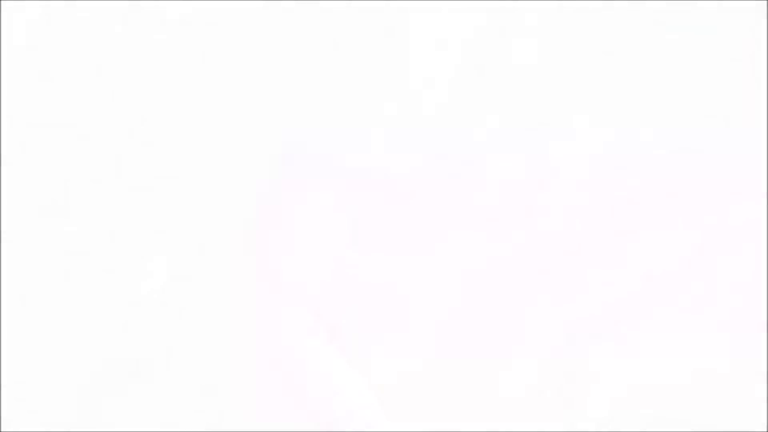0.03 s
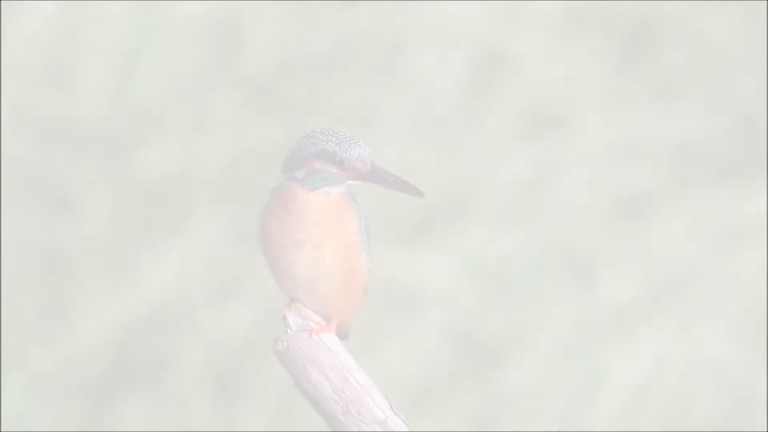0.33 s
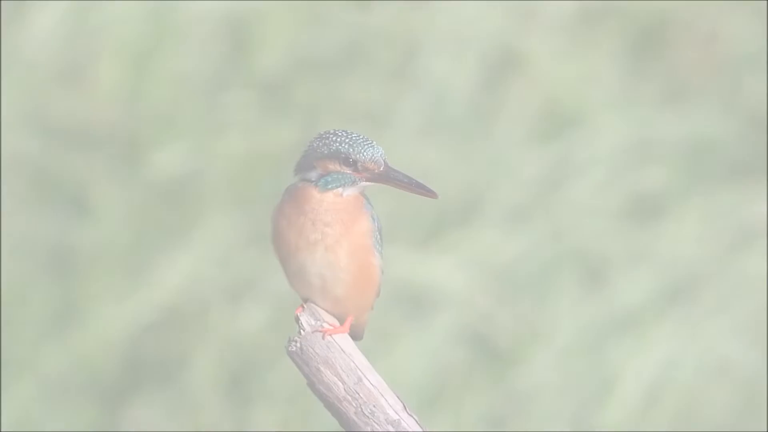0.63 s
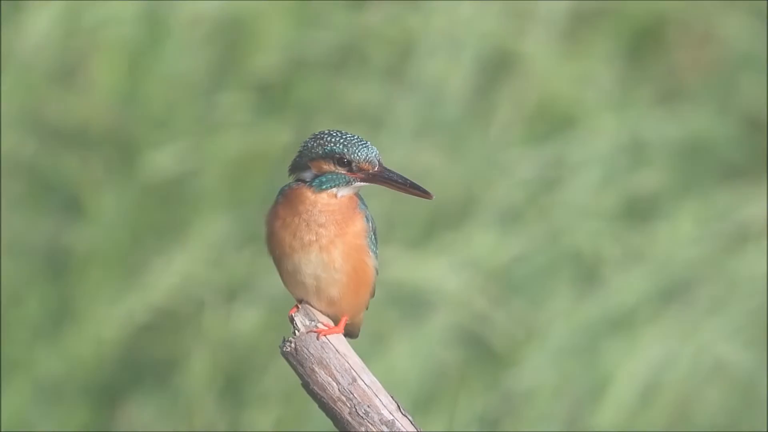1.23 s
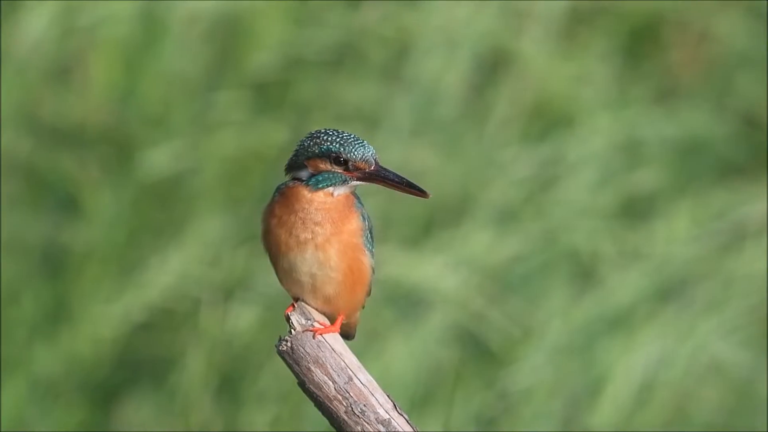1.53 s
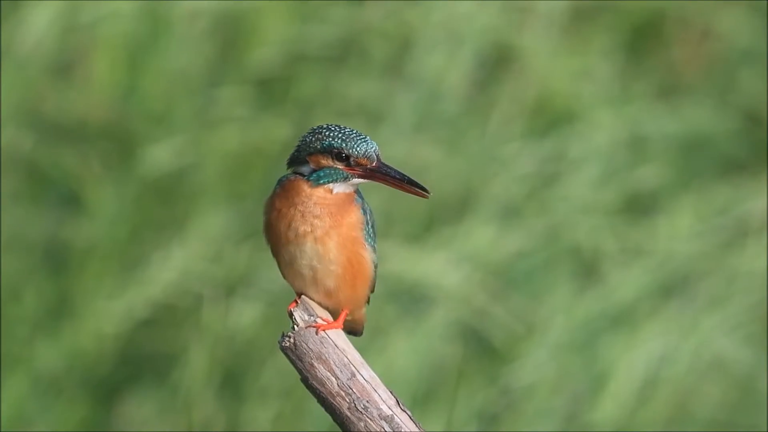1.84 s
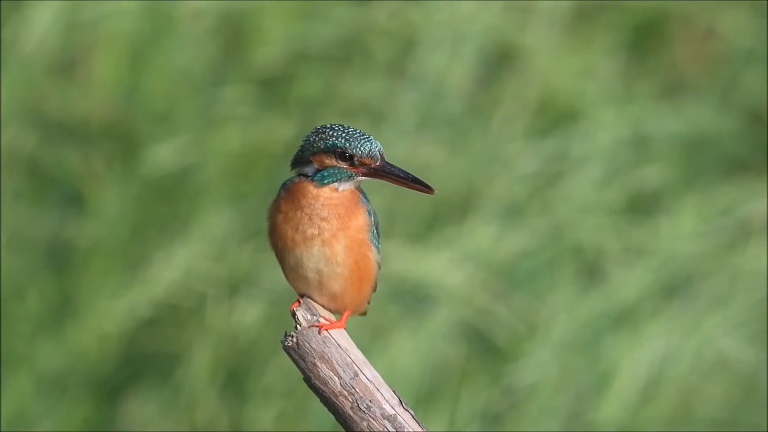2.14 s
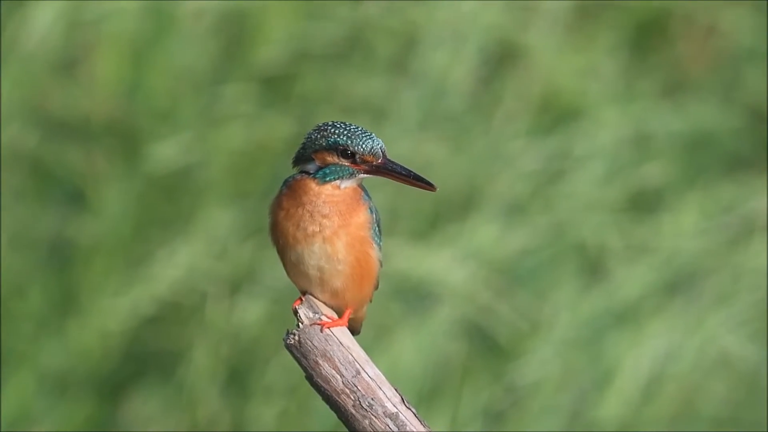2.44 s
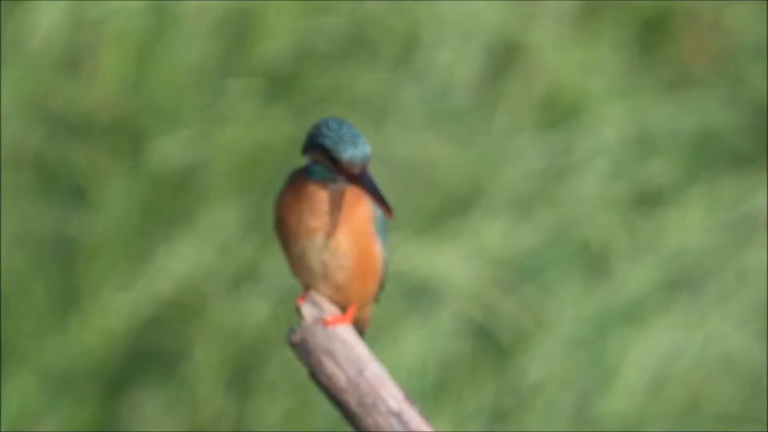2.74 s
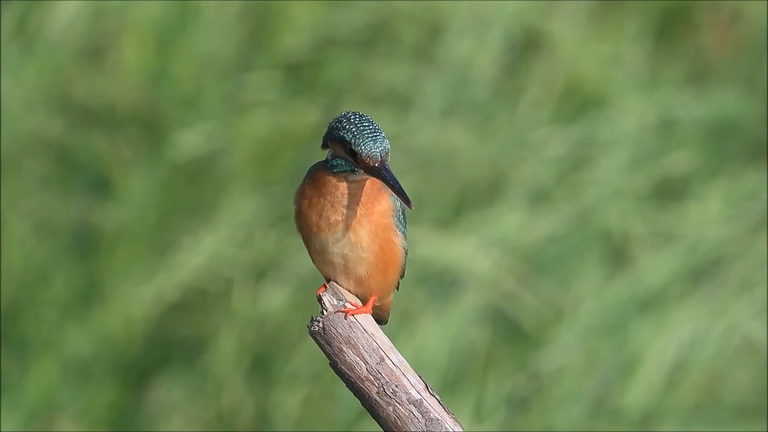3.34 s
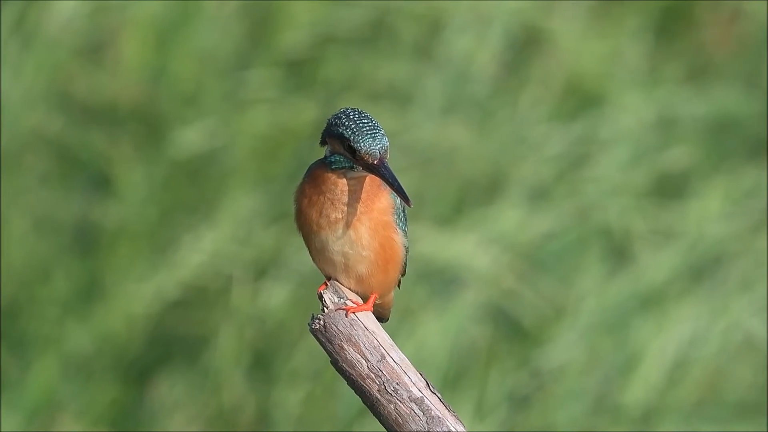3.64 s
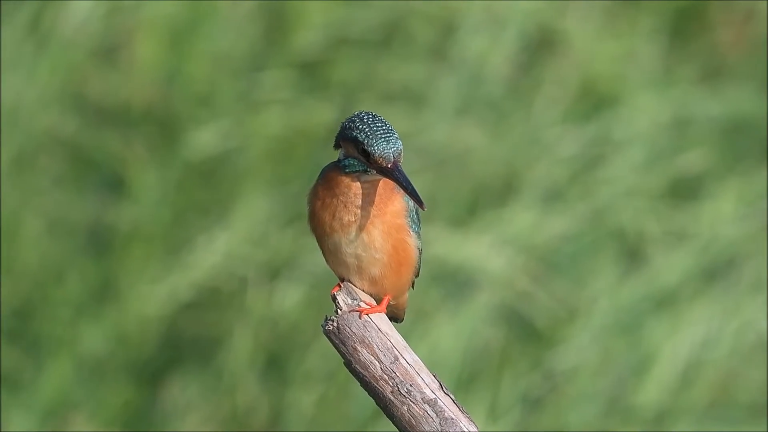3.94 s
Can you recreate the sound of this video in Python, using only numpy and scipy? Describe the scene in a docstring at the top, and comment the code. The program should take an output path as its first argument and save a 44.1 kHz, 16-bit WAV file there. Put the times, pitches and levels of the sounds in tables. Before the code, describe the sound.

A kingfisher gives three thin, high whistles over steady outdoor noise and light microphone taps.

```python
"""Kingfisher among trees

A kingfisher gives three thin, falling whistles, almost pure tones, that echo briefly among trees.
A steady wash of outdoor noise fades in behind it. Close by there is a soft bump and a short rustle.
Later, small taps ring the hollow housing of the right microphone, with scuffs and a thin scrape."""
import sys
import numpy as np
from scipy import signal
from scipy.fft import rfft, irfft
from scipy.io import wavfile
from scipy.ndimage import uniform_filter1d

SR = 44100
rng = np.random.default_rng(int(sys.argv[2]) if len(sys.argv) > 2 else 0)


def store_wav(level_fs):
    """Save 16-bit WAV to argv[1]."""
    pcm = np.round(np.clip(np.atleast_2d(level_fs), -1, 1) * 32767)
    wavfile.write(sys.argv[1], SR, pcm.T.astype(np.int16))


N = 176400  # 4 seconds

# The bird's notes: start_s, length_s, top_hz, end_hz, mid_fall_s (after the start), fall_pace_s
NOTES = [(0.994, 0.063, 5460, 4800, .043, 0.0078), (1.876, 0.065, 5800, 4890, 0.028, 0.0046),
         (2.825, 0.0636, 5604, 4920, .036, .0055)]
# How each note swells and dips, one list per note: time_s, level_db
NOTE_LOUDNESS = [
    [(.995, -43), (1.003, -40), (1.013, -47), (1.021, -32), (1.032, -25.5), (1.041, -36), (1.057, -34)],
    [(1.878, -30), (1.891, -23.5), (1.898, -33), (1.907, -25.5), (1.914, -41), (1.926, -29.5), (1.946, -33)],
    [(2.826, -39), (2.834, -29.5), (2.847, -33), (2.852, -39), (2.859, -20), (2.871, -40), (2.880, -30),
     (2.889, -36)],
]
# Echoes off nearby surfaces: delay_s, left_db, right_db
NEAR_ECHOES = [(.0043, -21, -22), (.0117, -24, -26), (.0205, -21, -29)]
# Taps on the microphone housing: start_s, ring_db, tick_db, contact_s
HOUSING_TAPS = [(2.783, -28.5, -55, .001), (2.7908, -24.5, -60, 0.0018), (2.8160, -22, -55, 0.0016),
                (2.8656, -23.5, -55, .002), (2.98, -21.5, -60, 0.0013), (3.1443, -23, -55, .0006),
                (3.272, -19.5, -45, 0.00015), (3.7503, -9, -6, 0.0004), (3.8153, -28, -60, 0.00073),
                (3.8186, -15, -46, 0.00055), (3.9413, -23, -35, .0005), (3.9490, -19, -35, 0.00039)]
# The tones of the tapped housing: pitch_hz, level_db, ring_s (time to fall by 60 dB)
HOUSING_TONES = [(1443, -1, .024), (1290, -19, .018), (1580, -16, 0.017), (2280, -18, 0.017),
                 (3070, -24, 0.022)]
# The tone colour of a tap's sharp tick: frequency_hz, level_db
TICK_SPECTRUM = [(1000, -34), (2000, -10), (2900, -9), (3900, -10.5), (5150, 0), (6300, -3), (7600, -10),
                 (9000, -4), (10600, 2), (12400, -14), (15500, -15)]
# The low tones of the bump: pitch_hz, level_db, ring_s
BUMP_TONES = [(135, -41, 0.072), (223, -37.5, 0.064)]
# Strokes of the rustle: start_s, level_db, decay_s
RUSTLE_STROKES = [(1.258, -50, 0.075), (1.312, -41.5, 0.024)]
# The rustle's crisp tone colour: frequency_hz, level_db
RUSTLE_SPECTRUM = [(500, -21), (1500, 2), (2400, -1.5), (3500, 3.5), (6000, 0.5), (9000, -6.5),
                   (13000, -10), (16000, -21)]
# Soft scuffs on the housing: start_s, level_db, decay_s
SCUFF_STROKES = [(2.782, -38.5, .014), (2.860, -36.5, .012), (2.937, -41, 0.021), (2.980, -41, 0.018),
                 (3.015, -43, 0.034)]
# The scuffs' dull tone colour: frequency_hz, level_db
SCUFF_SPECTRUM = [(60, -14), (300, -8), (720, 6), (1000, -6), (1400, 4), (2200, -21), (6000, -32),
                  (16000, -50)]
# A scrape among the last taps: start_s, level_db, decay_s
SCRAPE_STROKES = [(3.931, -49.5, 0.019)]
# The scrape's thin tone colour: frequency_hz, level_db
SCRAPE_SPECTRUM = [(3000, -30), (7000, -14), (8800, 3), (10300, -10), (12000, -2), (16000, -20)]
# The tone colour of the outdoor wash: frequency_hz, level_db
WASH_SPECTRUM = [(12, -42), (20, -31), (53, -1.5), (96, -2), (113, -4), (163, -9.5), (248, -6.5),
                 (410, -10), (459, -8), (527, -7.5), (825, -2.5), (1260, -1), (1660, -2.5), (2750, -11),
                 (3250, -12), (4300, -13.5), (6910, -19), (13900, -30.5), (16000, -35)]
# How alike the wash is on both sides: frequency_hz, likeness (1 = the same, 0 = unrelated)
WASH_LIKENESS = [(30, 0.91), (120, 0.95), (300, 0.71), (600, 0.3), (1200, -0.17), (2500, -0.39),
                 (6000, 0.13), (15000, -0.084)]
# Which side of the wash is louder: frequency_hz, left_minus_right_db
WASH_BALANCE = [(60, -0.5), (240, -0.5), (950, -3), (3770, -1.5), (15000, 2)]
# The fade-in of the whole sound: time_s, gain_db
FADE_CURVE = [(.09, -68), (0.109, -30.5), (.25, -19.5), (.4, -11.5), (.6, -5.5), (.85, -1.5), (1.2, -0.3),
              (2.1, 0.5), (4, 0.5)]


def kingfisher(echo_s=0.37, trees_db=-9):
    """The whistles arrive directly, off a few near surfaces, and scattered by the trees."""
    calls = np.zeros((1, N))
    for note, loudness in zip(NOTES, NOTE_LOUDNESS):
        add(calls, note[0], whistle(loudness, *note))
    t = np.arange(SR // 2) / SR
    # The trees' many tiny echoes blur into dying noise.
    paths = rng.standard_normal((2, len(t))) * die_away(t, echo_s) * np.minimum(t / 0.0061, 1)
    paths *= amp(trees_db) / np.linalg.norm(paths[0])
    paths[:, 0] += amp([-7.5, -0.5])  # the direct sound, louder on the right
    for delay_s, left_db, right_db in NEAR_ECHOES:
        add(paths, delay_s, amp([[left_db], [right_db]]))
    return signal.fftconvolve(calls, paths, axes=1)[:, :N]


def whistle(loudness, start_s, length_s, top_hz, end_hz, mid_fall_s, fall_pace_s):
    """A nearly pure tone scoops up, holds, then slides to a lower note, in a few surges."""
    attack_s, release_s = 0.0034, 0.004
    beak_hz, beak_width_hz = 11250, 640
    t = np.arange(0, length_s, 1 / SR)
    scoop_hz = 200 * np.exp(-t / 0.0039)
    pitch_hz = end_hz + (top_hz - end_hz) / (1 + np.exp((t - mid_fall_s) / fall_pace_s)) - scoop_hz
    waver = 1 + 0.0045 * drift(len(t), hz=400)
    phase = 2 * np.pi * np.cumsum(pitch_hz * waver) / SR
    flutter_db = 2 * drift(len(t), hz=130)
    level_db = np.interp(start_s + t, *np.transpose(loudness)) + flutter_db
    on_off = np.clip(np.minimum(t / attack_s, (length_s - t) / release_s), 0, 1)
    # The overtone at twice the pitch is strongest near the beak's resonance.
    overtone_gain = amp(-25.5) / np.hypot(1, 2 * (2 * pitch_hz - beak_hz) / beak_width_hz)
    tone = np.sin(phase) + overtone_gain * np.sin(2 * phase) + amp(-39) * np.sin(3 * phase)
    hiss = cut_lows(rng.standard_normal(len(t)), hz=4500)
    rasp = amp(-26) * hiss * np.exp(-((t - 0.008) / 0.005) ** 2)  # a trace of noise as the note starts
    return on_off * amp(level_db) * (tone + rasp)


def taps():
    """Each tap rings the hollow housing on the right; hard ones add a bright tick."""
    out = np.zeros((2, N))
    for start_s, ring_db, tick_db, contact_s in HOUSING_TAPS:
        housing = cut_lows(ring(HOUSING_TONES, rise_s=contact_s), hz=1280)
        add(out, start_s, amp(ring_db) * pan(housing, left_db=-35))
        add(out, start_s, amp(tick_db) * pan(tick(), left_db=-8.5))
    return out


def tick(scatter_s=0.0016):
    """A sharp snap with a very short spray of noise behind it."""
    t = np.arange(2048) / SR
    log_gain = np.log(amp(look_up(TICK_SPECTRUM, abs(np.fft.fftfreq(len(t), 1 / SR)))))
    snap = np.fft.ifft(np.exp(signal.hilbert(log_gain).conj())).real  # packs the energy at the start
    hit = t == 0
    scatter = 0.084 * rng.standard_normal((2, len(t))) * np.exp(-t / scatter_s)
    return signal.fftconvolve(hit + scatter, snap[None] / abs(snap).max(), axes=1)


def bump():
    """One soft, dull knock in the middle: two low tones that die quickly."""
    out = np.zeros((2, N))
    add(out, start_s=0.811, sound=ring(BUMP_TONES, rise_s=0.0011))
    return out


def ring(tones, rise_s):
    """A struck object shakes at several pitches at once, each dying at its own pace."""
    t = np.arange(SR // 10) / SR
    ringing = sum(amp(db) * die_away(t, ring_s) * np.sin(2 * np.pi * hz * t) for hz, db, ring_s in tones)
    return (1 - np.exp(-t / rise_s)) * ringing


def rubbing(strokes, spectrum, left_db, rise_s=0.0045):
    """Surfaces rub together in quick strokes, each a burst of grainy noise."""
    out = np.zeros((2, N))
    t = np.arange(SR // 2) / SR
    colour = amp(look_up(spectrum, np.fft.rfftfreq(len(t), 1 / SR)))
    for start_s, level_db, decay_s in strokes:
        grains = rng.standard_normal((2, len(t))) * amp(drift(len(t), hz=600))  # flickers by about 1 dB
        noise = unit(irfft(rfft(grains) * colour, len(t)))
        shape = np.minimum(t / rise_s, 1) * np.exp(-t / decay_s)
        add(out, start_s, amp(level_db) * noise * shape)
    return pan(out, left_db)


def outdoor_wash(level_db=-46, patch_db=1.1, swell_db=0.3):
    """Distant outdoor noise: a rumble in the middle and a wide, gently patchy hiss."""
    # The noise is built on a grid of short time slices by frequencies.
    slices, hz = N // 512 + 5, np.fft.rfftfreq(2048, 1 / SR)
    draws = rng.standard_normal((5, slices, len(hz)))
    left, unrelated = draws[0] + 1j * draws[1], draws[2] + 1j * draws[3]
    patches = unit(uniform_filter1d(uniform_filter1d(draws[4], size=7, axis=0), size=20, axis=1))
    swell = unit(uniform_filter1d(rng.standard_normal(slices), size=25))[:, None]
    likeness = look_up(WASH_LIKENESS, hz)
    right = likeness * left + np.sqrt(1 - likeness ** 2) * unrelated
    lean = amp(look_up(WASH_BALANCE, hz) / 2)
    grid = np.array([left * lean, right / lean])
    grid *= amp(look_up(WASH_SPECTRUM, hz) + patch_db * patches + swell_db * swell)
    noise = signal.istft(grid.swapaxes(1, 2), nperseg=2048, noverlap=1536)[1][:, :N]
    return amp(level_db) * unit(noise)


def amp(db):
    """Turns decibels into a number to multiply by."""
    return 10 ** (np.asarray(db) / 20)


def unit(x):
    """Scales a signal so its average strength (rms) is 1."""
    return x / np.sqrt(np.mean(x ** 2) + 1e-20)


def look_up(table, hz):
    """Reads smoothly between a table's rows, giving each octave about equal room."""
    row_hz, value = np.transpose(table)
    return np.interp(np.log(hz + 1), np.log(row_hz + 1), value)


def add(mix, start_s, sound):
    """Mixes a sound in at the given time."""
    part = mix[:, round(start_s * SR):][:, :sound.shape[-1]]
    part += sound[..., :part.shape[1]]


def pan(sound, left_db):
    """Moves a sound sideways by turning its left side up or down."""
    return sound * amp([[left_db], [0]])


def cut_lows(sound, hz):
    """Thins a sound by turning down what lies below hz."""
    return signal.sosfilt(signal.butter(2, hz, "high", fs=SR, output="sos"), sound)


def die_away(t, ring_s):
    """A fade that falls by 60 dB in ring_s seconds."""
    return np.exp(-np.log(1000) * t / ring_s)


def drift(count, hz):
    """A random wobble of size about 1, with up to roughly hz wiggles a second."""
    rates_hz = np.fft.rfftfreq(SR, 1 / SR)
    smoothing = np.exp(-(rates_hz / hz) ** 2)
    return unit(irfft(rfft(rng.standard_normal(SR)) * smoothing, SR))[:count]


def scene():
    """All the sounds together at the left and right microphones."""
    rustle = rubbing(RUSTLE_STROKES, RUSTLE_SPECTRUM, left_db=3.5)
    scuffs = rubbing(SCUFF_STROKES, SCUFF_SPECTRUM, left_db=-4)
    scrape = rubbing(SCRAPE_STROKES, SCRAPE_SPECTRUM, left_db=-8)
    background = outdoor_wash()
    return kingfisher() + taps() + bump() + rustle + scuffs + scrape + background


def record(dry):
    """Fades everything in from near silence, then cuts the very highest treble."""
    faded = dry * amp(np.interp(np.arange(N) / SR, *np.transpose(FADE_CURVE)))
    treble_cut = signal.firwin(511, cutoff=15900, window=("kaiser", 9), fs=SR)
    return signal.oaconvolve(faded, treble_cut[None], "same")


dry = scene()
out = record(dry)
store_wav(out)
```